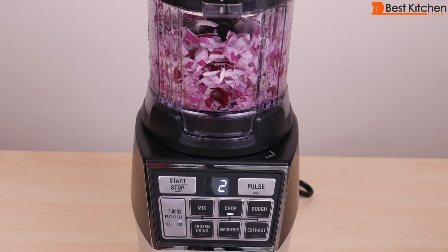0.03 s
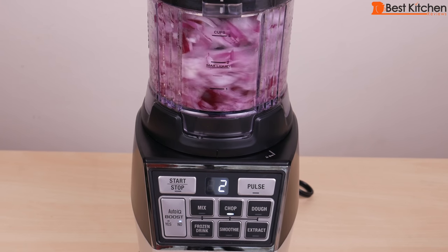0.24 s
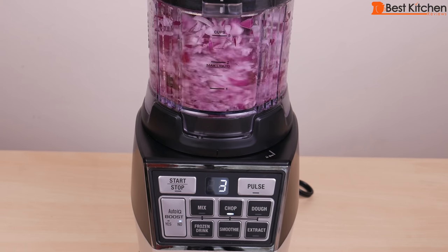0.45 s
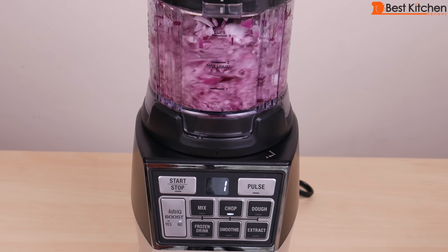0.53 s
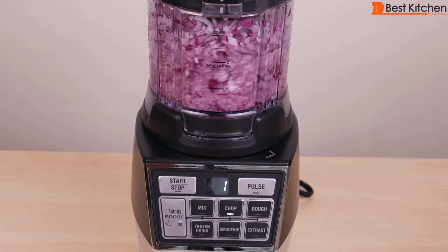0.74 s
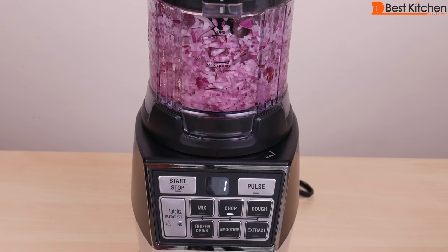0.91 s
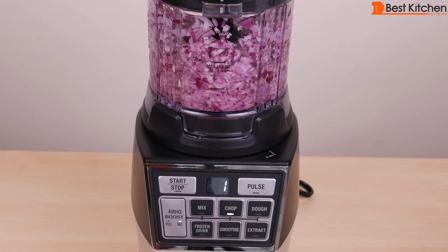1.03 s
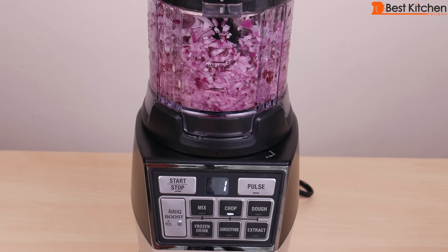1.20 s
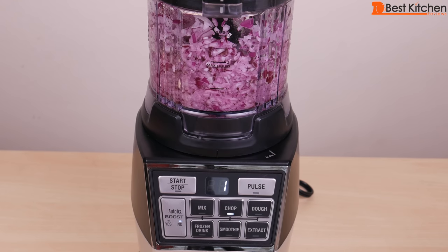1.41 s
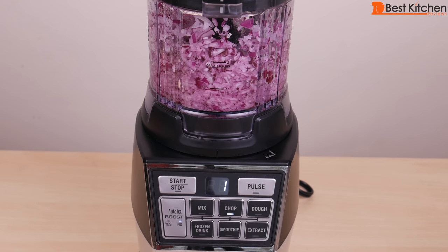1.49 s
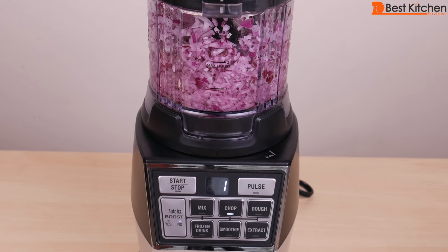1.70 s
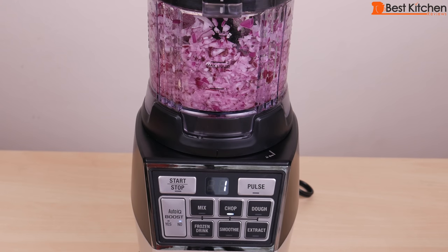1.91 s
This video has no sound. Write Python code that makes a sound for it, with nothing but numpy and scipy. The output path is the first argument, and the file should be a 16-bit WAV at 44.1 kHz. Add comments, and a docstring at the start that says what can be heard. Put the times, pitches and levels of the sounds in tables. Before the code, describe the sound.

Close microphone in a hard, reflective room: after a quiet click, a blender thumps into motion, roars and whirs with rattling onion pieces for under a second, slows sharply and leaves only faint room hum.

```python
"""A kitchen blender gives one pulse on chopped onion: a relay clicks, the motor jolts the jar, speeds up, coasts
and is braked to a stop. A hard room rings on, then low hum is left, with a steady tone and a faint whistle.
Motor: shaft-order sines, blurred whines and noise that follow one speed law. Onion: random blows and heavy
knocks through jar resonances. Clicks: shaped noise bursts. Room: decaying noise echoes and standing waves."""
import sys
import numpy as np
from scipy import signal
from scipy.fft import rfft, irfft, next_fast_len
from scipy.io import wavfile
from scipy.ndimage import uniform_filter1d, map_coordinates

SR = 44100
rng = np.random.default_rng(int(sys.argv[2]) if len(sys.argv) > 2 else 0)


def store_wav(level_fs):
    """Save 16-bit WAV to argv[1]."""
    pcm = np.round(np.clip(np.atleast_2d(level_fs), -1, 1) * 32767)
    wavfile.write(sys.argv[1], SR, pcm.T.astype(np.int16))


def boost(x):
    """Linear amplitude factor 10**(x/20) for a level x in decibels (scalar or array-like)."""
    u = np.asarray(x, float) / 20
    return 10 ** u


N = 85995
T = np.arange(N) / SR

START_S, FREE_HZ = .229, 214.95  # motor start; shaft speed the spin-up tends to
LOAD_BUILDS_S = 0.024  # for the roar's bass and the rings of the base


def unit(x):
    """Scale to rms 1."""
    return x / np.sqrt(np.mean(x ** 2) + 1e-20)


def along(points, hz):
    """Interpolate (frequency [Hz], value) points on a log axis."""
    f, v = np.transpose(points)
    return np.interp(np.log(hz + 1), np.log(f + 1), v)


def wobble(knots_per_s):
    """Smooth random curve through normal knots."""
    knots = rng.standard_normal(int(N * knots_per_s / SR) + 4)
    return map_coordinates(knots, [T * knots_per_s])


def filtered(x, response):
    """Apply a complex response of frequency."""
    m = next_fast_len(N + SR // 2)
    return irfft(rfft(x, m) * response(np.fft.rfftfreq(m, 1 / SR)), m)[..., :N]


def noise(spectrum):
    """Coloured noise of rms 1."""
    return unit(filtered(rng.standard_normal(N), lambda hz: boost(along(spectrum, hz))))


def band_noise(centre_hz, half_width_hz):
    """Noise of rms 1 around one frequency."""
    response = lambda hz: 1 / (1 + ((hz - centre_hz) / half_width_hz) ** 2)
    return unit(filtered(rng.standard_normal(N), response))


def ringing(c_hz, w_hz):
    """One causal resonance, gain 1 at its centre."""
    return lambda hz: 1j * hz * w_hz / (c_hz ** 2 - hz ** 2 + 1j * hz * w_hz)


def burst(s, hold_s, t60_s):
    """Sharp start, short hold, exponential fade."""
    return (T >= s) * boost(-60 * np.clip(T - s - hold_s, 0, None) / t60_s)


def spread(a, b, alike):
    """Left and right from two signals, as alike as asked at each frequency."""
    turn = lambda hz: np.arccos(np.clip(along(alike, hz), -1, 1)) / 2
    mid, side = filtered(np.array([a, b]), lambda hz: np.array([np.cos(turn(hz)), np.sin(turn(hz))]))
    return np.array([mid + side, mid - side])


def speed():
    """Shaft turns a second: exponential spin-up under power, steady coasting, then the brake."""
    power_off_s, brake_s, spin_up_s = .535, .853, .165
    coast_hz_per_s, brake_hz_per_s = 160, 850
    powered_s = np.clip(np.minimum(T, power_off_s) - START_S, 0, None)
    powered_hz = FREE_HZ * (1 - np.exp(-powered_s / spin_up_s))
    coast_loss_hz = coast_hz_per_s * np.clip(T - power_off_s, 0, None)
    brake_loss_hz = brake_hz_per_s * np.clip(T - brake_s, 0, None)
    return np.clip(powered_hz - coast_loss_hz - brake_loss_hz, 0, None)


def shaft_orders(hz):
    """Unbalance: sines at multiples of shaft speed, radiated by base and counter, growing with speed."""
    # clean shaft orders: (multiple of speed, level [dB])
    orders = [(1, -1.5), (2, -5), (3, -13)]
    # radiation of base and counter: (frequency [Hz], gain [dB])
    radiation = [(60, -36), (115, -18), (138, -5), (180, 1), (250, -5), (295, 0.5), (320, 3), (340, -6),
                 (600, 0.5)]
    turn = 2 * np.pi * np.cumsum(hz) / SR
    low = 0
    for k, db in orders:
        tone = np.sqrt(2) * np.sin(k * turn + rng.uniform(0, 6))
        low = low + boost(db + 0.73 * wobble(17.0)) * tone
    low = filtered(low, lambda f: boost(along(radiation, f)))
    return (hz / FREE_HZ) ** 1.2 * low


def whines(hz):
    """Fan and commutator: high shaft orders blurred by random modulation, muffled by the housing."""
    # blurred whines: (multiple of speed, blur width [Hz], level before gain [dB])
    orders = [(13, 300, -7), (27.5, 500, -15), (72, 380, -22.5), (94, 500, -34)]
    gain_db, speed_jitter, dull_hz = 2, .005, 11800
    turn = 2 * np.pi * np.cumsum(hz * (1 + speed_jitter * wobble(30))) / SR
    whine = 0
    for k, w, db in orders:
        level = boost(db + gain_db + 1.8 * wobble(21.0))
        blurred = unit(wobble(w)) * np.sin(k * turn) + unit(wobble(w)) * np.cos(k * turn)
        whine = whine + level * blurred
    whine = filtered(whine, lambda f: 1 / (1 + (f / dull_hz) ** 6))
    return 1.2 * hz / FREE_HZ * whine


def roar(hz):
    """Air and housing noise: treble rises with speed, bass builds up after the start."""
    # roar spectrum: (frequency [Hz], relative density [dB])
    spectrum = [(30, -46), (60, -26), (115, -19.5), (145, -11.5), (200, -5.5), (255, -14.5), (310, -6),
                (420, -10.5), (570, -10.5), (1230, -18), (1900, -14.5), (2400, -14.5), (2760, -16.5),
                (6000, -26), (8300, -32), (10100, -32), (13000, -41.5), (15400, -54)]
    level_db, brightens_db = 1, 16.5  # treble gain from standstill to FREE_HZ
    treble_hz, bass_hz = 2100.0, 496
    rush = noise(spectrum)
    treble = filtered(rush, lambda f: f ** 2 / (f ** 2 + treble_hz ** 2))
    rush = rush + treble * (boost(brightens_db * (hz / FREE_HZ - 0.67)) - 1)
    bass = filtered(rush, lambda f: bass_hz ** 2 / (f ** 2 + bass_hz ** 2))
    rush = rush - bass * np.exp(-np.clip(T - START_S, 0, None) / LOAD_BUILDS_S)
    return boost(level_db + 0.57 * wobble(30)) * rush


def motor():
    """Shaft orders, whines and roar driven by one speed, smoothed by inertia."""
    inertia_s = .04
    hz = np.abs(uniform_filter1d(speed(), int(inertia_s * SR)))
    return shaft_orders(hz) + whines(hz) + roar(hz)


def housing():
    """One housing mode rings on noise, the more the faster the shaft turns."""
    # housing ring: (frequency [Hz], width [Hz], level before gain [dB])
    hz, w, db = (2350, 77, -13)
    ring = unit(filtered(rng.standard_normal(N), lambda f: ringing(hz, w)(f) ** 2))
    return boost(db + 4.5) * speed() / FREE_HZ * ring


def jar(hz, soft_hz):
    """Response of jar and housing: resonances of alternating sign, dulled by a soft contact."""
    # resonances: (frequency [Hz], width [Hz], gain [dB])
    resonances = [(140, 18, -3), (242, 34, 3), (306.7, 37, 1.5), (366, 51, 1), (560.3, 70, -0.5),
                  (880, 230, 0), (1088, 120, -0.5), (1488, 200, -2.5), (1915, 50, -6.5), (2380, 49, 0.5),
                  (3160, 110, -17), (3695, 280, -2), (3995, 450, -8.5), (5150, 260, -5.5),
                  (10100, 1000, -7)]
    modes = sum((-1) ** k * boost(db) * ringing(c, w)(hz) for k, (c, w, db) in enumerate(resonances))
    return modes / (1 + 1j * hz / soft_hz) ** 2


def chopping():
    """A hail of pieces of uneven size on the jar wall: random impulses through the jar."""
    chops_per_s, level_db, soft_hz = 900, -9.5, 4870
    spread_db, most_db = 6, 9  # mean and cap of the exponential draw of blow levels
    draw = rng.random((int(chops_per_s * N / SR), 3))
    at = (draw[:, 0] * N).astype(int)
    size = boost(np.minimum(-spread_db * np.log(draw[:, 1]), most_db))
    blows = np.zeros(N)
    np.add.at(blows, at, size * np.sign(draw[:, 2] - .5))
    return boost(level_db) * unit(filtered(blows, lambda hz: jar(hz, soft_hz)))


def jolt():
    """Heavy knocks as the pile is thrown: peak-scaled impulse responses of the jar."""
    # knocks: (time [s], peak level [dB], contact softness [Hz])
    knocks = [(0.2388, -21.5, 3000), (.249, -16.5, 1100), (.258, -30, 700), (.266, -19.5, 700),
              (.274, -29, 900), (.285, -23, 1200), (.307, -26, 1200), (0.322, -24.5, 700),
              (0.357, -22.5, 3500)]
    out, hz = np.zeros(N + SR), np.fft.rfftfreq(SR // 2, 1 / SR)
    for s, db, soft_hz in knocks:
        ring = irfft(jar(hz, soft_hz))
        out[round(s * SR):][:len(ring)] -= boost(db) * ring / np.abs(ring).max()
    return out[:N]


def strain():
    """Narrow rings of the base as torque loads it and the shaft stops: swelling, wavering sines."""
    # rings: (strongest at [s], swell time constant [s], frequency [Hz], waver [Hz], level [dB])
    rings = [(.34, 0.098, 146, 5.8, -38), (.25, .025, 240, 9.7, -37), (0.3, 0.066, 378, 11.9, -35),
             (1.058, 0.045, 148, 4.6, -55), (1.052, 0.053, 336, 3.75, -55)]
    load = np.clip((T - START_S) / LOAD_BUILDS_S, 0, 1)
    out = 0
    for s, length_s, hz, waver_hz, db in rings:
        swell = load * np.exp(-((T - s) / length_s) ** 2)
        phase = 2 * np.pi * np.cumsum(hz + waver_hz * wobble(25)) / SR
        out = out + boost(db + 1.7 * wobble(25)) * swell * np.sqrt(2) * np.sin(phase)
    return out


def relay():
    """Relay chatter: coloured noise in short bursts with a soft attack."""
    # clicks: (time [s], level [dB], t60 [s])
    contacts = [(0.1786, -52.5, 0.16), (0.215, -54, .05)]
    # click spectrum: (frequency [Hz], relative density [dB])
    tone = [(240, -38), (400, -7), (604, -2.5), (820, -25.5), (1080, -3), (1320, -13.5), (1510, -3.5),
            (3140, -12), (3550, -7), (5880, -12.5), (6740, -16.5), (9440, -15.5), (11500, -24),
            (13400, -15.5), (15400, -27)]
    chatter_s, attack_s = 0.011, 0.0024
    envelope = 0
    for s, db, t60_s in contacts:
        attack = 1 - np.exp(-np.clip(T - s, 0, None) / attack_s)
        envelope = envelope + boost(db) * attack * burst(s, chatter_s, t60_s)
    return noise(tone) * envelope


def clutch():
    """A small tick as the drive takes up its play: one band-noise burst."""
    # tick: (time [s], level [dB], frequency [Hz], half-width [Hz])
    s, db, hz, half_width_hz = (.216, -50, 2300, 400)
    return boost(db) * band_noise(hz, half_width_hz) * burst(s, .006, 0.037)


def ticks():
    """Bright metal ticks: short bursts of high band noise."""
    # ticks: (time [s], level before gain [dB], frequency [Hz])
    strikes = [(0.3634, -34.5, 10300), (0.508, -37, 10060), (0.554, -37.5, 10500), (0.766, -37.5, 9810),
               (0.854, -32, 9960)]
    gain_db, half_width_hz, hold_s, t60_s = -8.5, 500, .004, .04
    return sum(boost(db + gain_db) * band_noise(hz, half_width_hz) * burst(s, hold_s, t60_s)
               for s, db, hz in strikes)


def room(x):
    """Echoes die at a rate set by frequency; the random noise tail is redrawn and crossfaded every .15 s."""
    # decay: (frequency [Hz], t60 [s])
    decay = [(120, .5), (350, 0.67), (900, 0.4), (1500, 0.55), (2300, 0.46), (5000, 0.54), (9500, 0.38),
             (14000, 0.34)]
    # echo level: (frequency [Hz], gain [dB])
    colour = [(100, -11), (170, -11), (330, -4.5), (600, -4.5), (1500, -3), (2500, -9), (5000, -7.5),
              (9500, -3), (14000, -4)]
    # stereo: (frequency [Hz], left-right likeness)
    alike = [(150, 0.87), (400, 0.85), (1000, 0.46), (2500, 0.55), (5000, 1), (7000, 0.72), (9000, -0.34),
             (14000, -0.24)]
    redraw_s, delay_samples = .15, 300
    pair = 0
    for middle_s in np.arange(1, 9) * redraw_s:
        hz, t, z = signal.stft(rng.standard_normal((2, SR * 3 // 4)), SR, nperseg=256)
        fade = boost(-60 * t / along(decay, hz)[:, None])
        tail = signal.istft(z * fade, SR, nperseg=256)[1]
        tail = tail / np.linalg.norm(tail[0])
        share = np.cos(np.pi / 2 * np.clip((T - middle_s) / redraw_s, -1, 1))
        delayed = np.pad(x * share, (delay_samples, 0))
        pair = pair + signal.fftconvolve(delayed[None], tail, axes=1)[:, :N]
    return filtered(spread(*pair, alike), lambda hz: boost(along(colour, hz)))


def standing_waves(x):
    """Narrow room resonances excited by the source."""
    # standing waves: (frequency [Hz], width [Hz], gain [dB])
    waves = [(147.8, 2.8, -8), (341, 2.8, -10.5)]
    return sum(boost(db) * filtered(x, ringing(hz, w)) for hz, w, db in waves)


def hum():
    """Slightly lumpy room tone: coloured stereo noise."""
    # room tone: (frequency [Hz], relative density [dB])
    spectrum = [(15, -68.5), (25, -17.5), (42, -27), (129, -2.5), (233, -6), (330, -12.5), (357, -9.5),
                (455, -13.5), (493, -11), (549, -13), (992, -20.5), (2910, -31), (15400, -42.5)]
    # stereo: (frequency [Hz], left-right likeness)
    alike = [(60, 0.52), (180, 0.53), (550, -0.3), (1640, -0.37), (4950, 0.069), (14900, 0.39)]
    level_db = -63.5
    return boost(level_db + 0.63 * wobble(20)) * spread(noise(spectrum), noise(spectrum), alike)


def drone():
    """Steady room tone: a sine with slight level drift."""
    # tone: (frequency [Hz], level [dB])
    tones = [(463.0, -75.5)]
    return sum(boost(db + .7 * wobble(2.1)) * np.sqrt(2) * np.sin(2 * np.pi * hz * T) for hz, db in tones)


def whistle():
    """A faint wavering whistle far off: a frequency-modulated sine that swells and fades."""
    # swells: (start [s], length [s], peak level [dB])
    swells = [(-.02, 0.15, -83.5), (1.486, 0.18, -87)]
    centre_hz, waver_hz = 3000, 37.5
    swell = sum(boost(db) * np.sin(np.pi * np.clip((T - s) / length_s, 0, 1)) for s, length_s, db in swells)
    return swell * np.sin(2 * np.pi * np.cumsum(centre_hz + waver_hz * wobble(60)) / SR)


def scene():
    """The blender, direct and through the room, over the background."""
    # how hard the machine shakes: (time [s], level [dB])
    effort = [(.228, -44), (.233, -25.5), (.27, -31), (.36, -32), (.5, -33.5), (.7, -34.5), (.85, -32),
              (.9, -37.5), (0.949, -38), (1.0, -48), (1.1, -59.5)]
    # stereo balance: (frequency [Hz], left minus right [dB])
    lean = [(60, -7), (180, -0.5), (550, 0.0), (1640, 0.5), (4950, 0.5), (14900, -1)]
    low_cut_hz = 92
    s, db = np.transpose(effort)
    shaking = boost(np.interp(T, s, db)) * (T > s[0]) * (T < s[-1])
    blender = shaking * (motor() + housing() + chopping())
    blender = blender + jolt() + strain() + relay() + clutch() + ticks()
    blender = filtered(blender, lambda hz: 1 / (1 + low_cut_hz / (1j * hz + 1e-3)) ** 2)
    heard = blender + room(blender) + standing_waves(blender)
    heard = filtered(heard, lambda hz: boost(along(lean, hz) / 2 * np.array([[1], [-1]])))
    return heard + hum() + drone() + whistle()


def band_limit(x):
    """A steep low-pass at the top of the band."""
    return signal.sosfilt(signal.butter(12, 15530, fs=SR, output="sos"), x)


def record(dry):
    """A dip in the microphone's treble."""
    dip_hz, half_width_hz, depth = 8020, 150, 0.43
    heard = filtered(dry, lambda hz: 1 - depth / (1 + ((hz - dip_hz) / half_width_hz) ** 2))
    return band_limit(heard)


dry = scene()
out = record(dry)
store_wav(out)
```